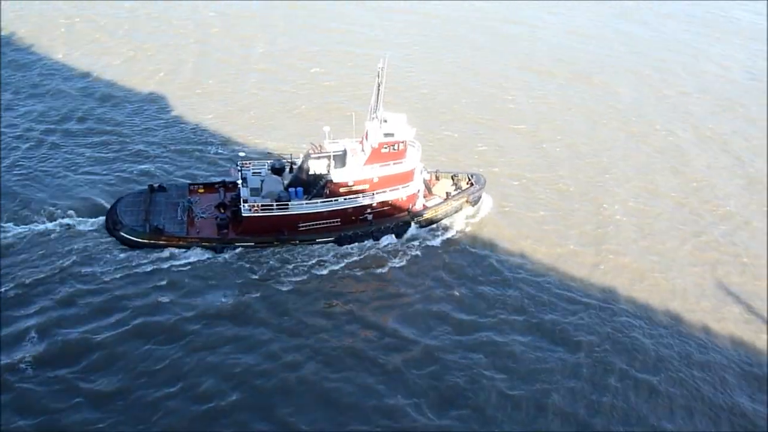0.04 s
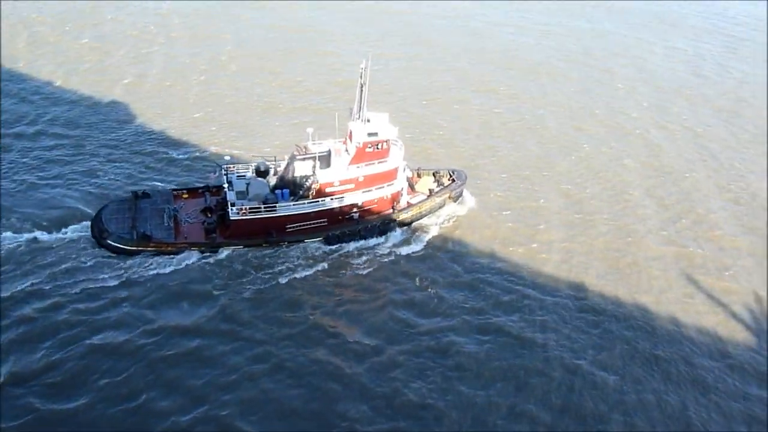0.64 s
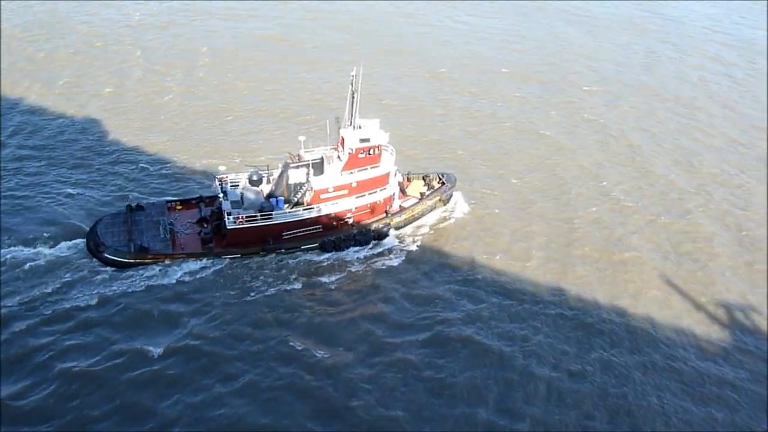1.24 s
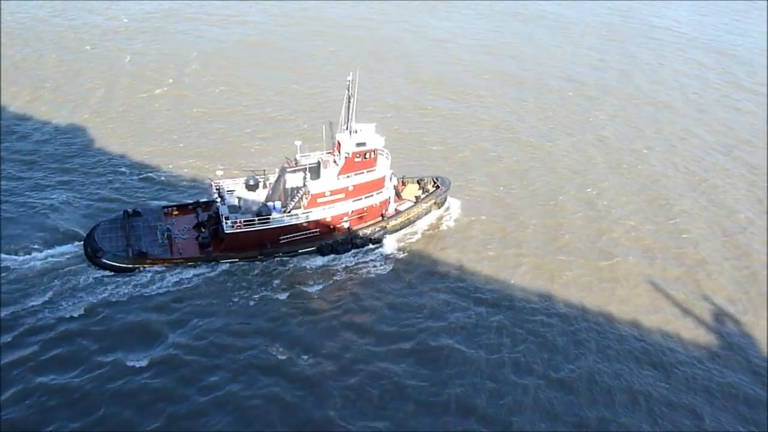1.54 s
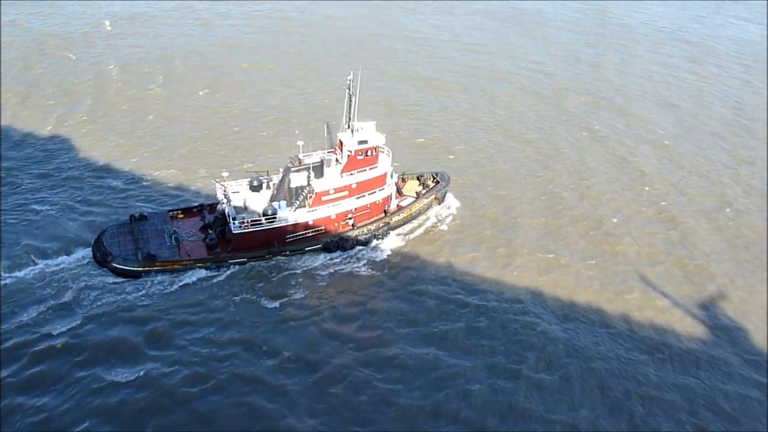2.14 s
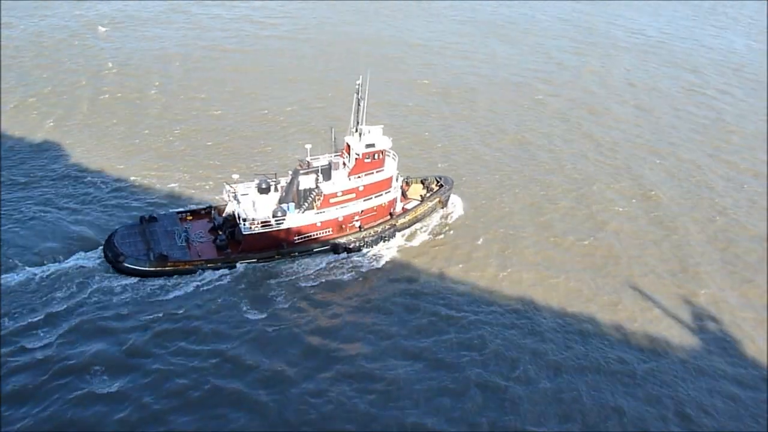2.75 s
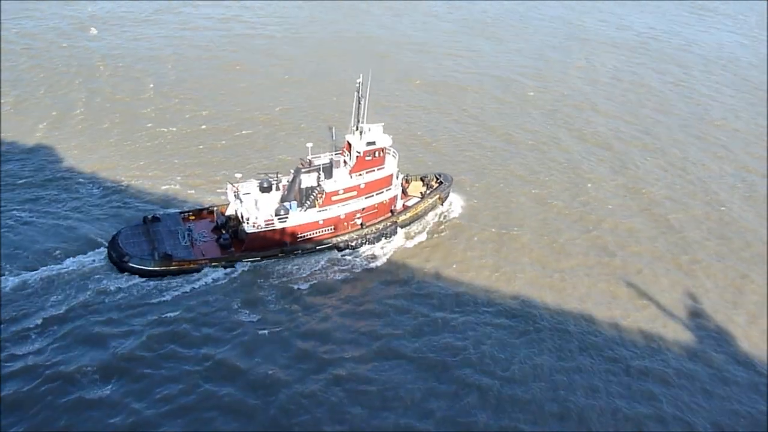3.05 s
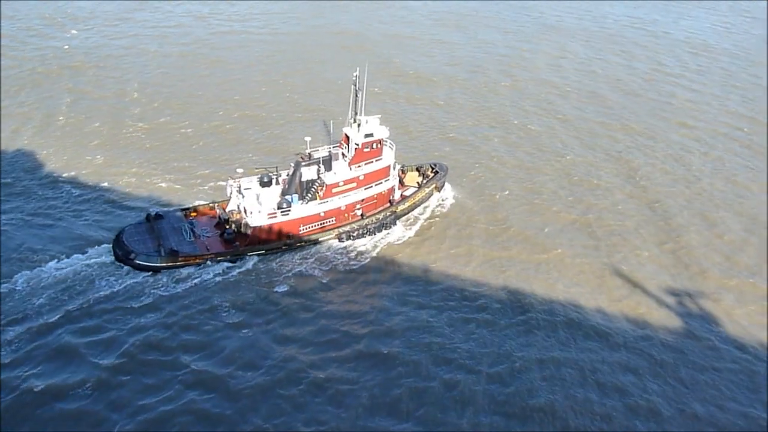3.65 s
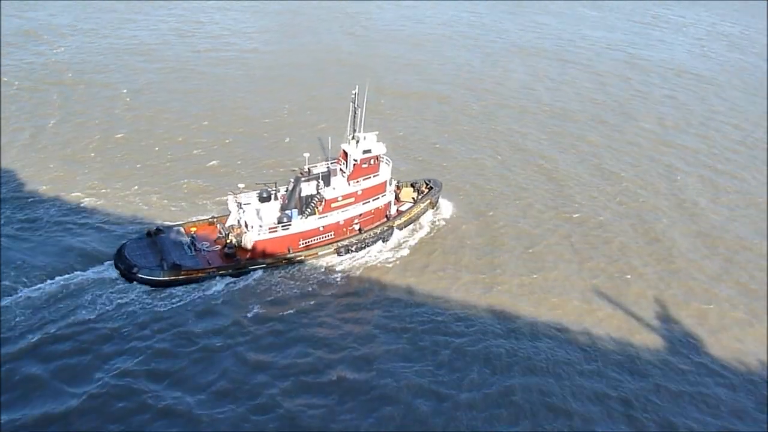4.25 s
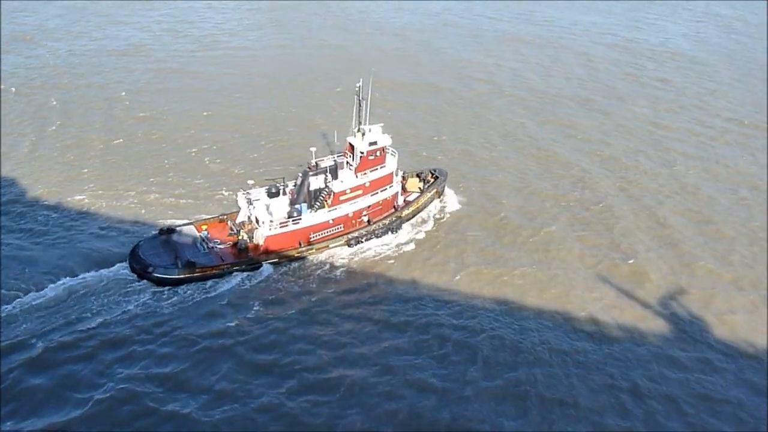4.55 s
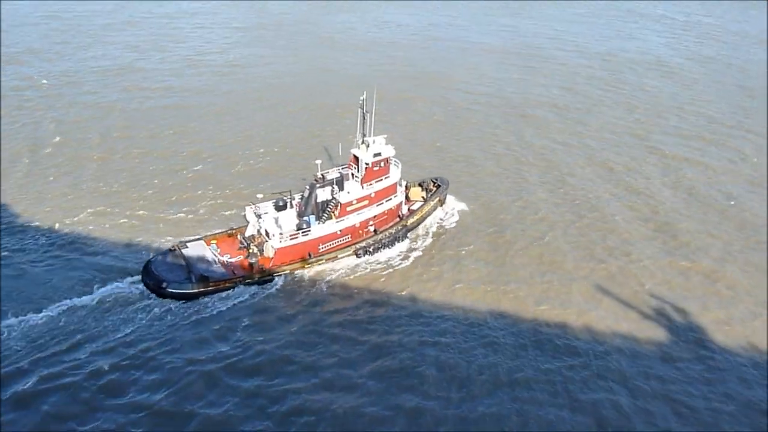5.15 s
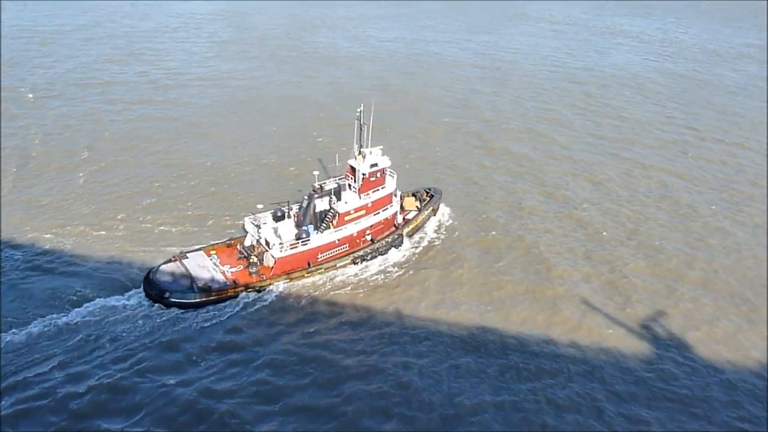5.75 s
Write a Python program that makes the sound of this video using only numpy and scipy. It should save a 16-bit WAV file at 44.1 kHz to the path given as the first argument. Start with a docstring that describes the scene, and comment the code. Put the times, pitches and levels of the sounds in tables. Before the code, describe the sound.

A ship's deep, brassy air horn sounds two long blasts, echoing across a harbour over a faint tugboat hum and washing water.

```python
"""Ship's air horn over a harbour

A deep air horn sounds two long blasts, heard from high on deck; the first is already under way.
Its diaphragm lets out one sharp puff a cycle; moving air makes the upper partials swell and fade,
and the quays echo. The air valve hisses before the horn speaks. Between the blasts a tug's diesel
hums and whines below, over the wash of the water and a light wind."""
import sys
import numpy as np
from scipy import signal
from scipy.fft import rfft, irfft, next_fast_len
from scipy.io import wavfile

SR = 44100
rng = np.random.default_rng(int(sys.argv[2]) if len(sys.argv) > 2 else 0)


def dump_mix(stems):
    """Bounce the given channels to the path in sys.argv[1] as a 16-bit WAV at rate SR."""
    frames = np.atleast_2d(stems).T  # one column per channel
    limited = np.clip(frames, -1, 1)  # hard clip at full scale
    pcm = np.round(limited * 32767).astype(np.int16)
    wavfile.write(sys.argv[1], SR, pcm)


N = 259749

# the blasts: start_s, valve_shut_s, treble_fall_db_per_s, ring_fall_db_per_s, air_off_s
BLASTS = [(-0.4015, 1.684, 562, 118, 1.68), (2.9704, 5.688, 22, 177, 5.76)]
# borders of the horn's bass, middle, treble, rasp and sizzle: edge_hz
REGISTER_EDGES = [140, 600, 1450, 3000, 6000, 14000]
# level ride of the horn's treble, one curve a blast: time_s, level_db
TREBLE_RIDE = [
    [(0.02, -34), (0.028, -28), (0.17, -32.5), (0.24, -40), (0.386, -37), (0.432, -42), (0.538, -38.5),
     (0.622, -26), (0.768, -34.5), (0.85, -42.5), (1.214, -37), (1.26, -42.5), (1.416, -37), (1.522, -38),
     (1.582, -26), (1.67, -28)],
    [(3.15, -35), (3.2, -38.5), (3.44, -27.5), (3.53, -34), (3.71, -25), (3.81, -34), (3.99, -30),
     (4.31, -43.5), (4.37, -35), (4.58, -44), (4.73, -36.5), (5.3, -37.5), (5.4, -32.5), (5.62, -48),
     (5.68, -40)],
]
# how alike left and right are in the echoes and the water: frequency_hz, correlation
STEREO_LIKENESS = [(30, .6), (100, .95), (250, .995), (500, .97), (1000, .85), (2500, .5), (6000, .15)]

HORN_HZ = 92.71
ATTACK_S, SETTLE_S = 0.073, 0.09  # the horn speaks, then settles
DROP_S, RING_S = 0.037, 0.23  # it drops as the valve shuts, then its low partials ring on


def air_horn():
    """The horn's direct sound: blasts of diaphragm puffs, each register riding its own level curve."""
    # level rides, one curve a blast: time_s, level_db
    bass = [
        [(0.02, -19.5), (0.386, -17.5), (0.622, -18.5), (0.69, -20.5), (1.512, -17.5), (1.67, -21)],
        [(3.05, -19), (3.17, -21.5), (3.24, -20.5), (3.75, -21.5), (3.9, -18.5), (4.38, -21), (4.78, -21.5),
         (4.9, -18.5), (5.68, -20)],
    ]
    middle = [
        [(0.02, -28), (0.038, -26), (0.208, -33.5), (0.386, -28.5), (0.456, -31), (0.714, -30), (0.764, -32.5),
         (0.87, -28.5), (1.02, -31), (1.67, -25)],
        [(3.15, -28.5), (3.16, -29.5), (3.52, -22.5), (3.96, -29.5), (4.73, -29), (4.95, -35.5), (5.15, -29.5),
         (5.31, -34.5), (5.57, -33), (5.68, -36.5)],
    ]
    rasp = [
        [(0.02, -44), (0.44, -51), (0.72, -43), (0.86, -48), (1.21, -46.5), (1.28, -52), (1.42, -45),
         (1.49, -46.5), (1.56, -40), (1.6, -43.5), (1.67, -35.5)],
        [(3.06, -41.5), (3.27, -41.5), (3.41, -49.0), (3.51, -37.0), (3.65, -39.5), (3.69, -35.5),
         (3.79, -48.5), (4.0, -42), (4.14, -45), (4.28, -47.5), (4.53, -46.5), (4.63, -50), (5.23, -44.0),
         (5.3, -49.5), (5.47, -45), (5.61, -51), (5.67, -45)],
    ]
    sizzle = [
        [(0.02, -50.5), (0.06, -37.5), (0.13, -48.5), (0.16, -44), (0.2, -53.5), (0.79, -52.5), (1.28, -58.5),
         (1.42, -53), (1.49, -65), (1.6, -45), (1.67, -48.5)],
        [(3.06, -52.5), (3.13, -48.0), (3.2, -58), (3.3, -46.5), (3.41, -53.0), (3.48, -46.5), (3.65, -52.0),
         (3.69, -45), (3.79, -53.0), (4.0, -50), (4.32, -59), (4.53, -51.5), (4.56, -58), (5.23, -51.5),
         (5.3, -61), (5.47, -52.5), (5.67, -59.5)],
    ]
    blasts = zip(BLASTS, bass, middle, TREBLE_RIDE, rasp, sizzle)
    return gain_of(0.1) * sum(blast(row, rides) for row, *rides in blasts)


def blast(row, rides, size=2048, flare_hz=380, top_hz=10000, flicker_db=3.4):
    """One pressure pulse for each opening of the diaphragm, coloured by the horn and the air on the way."""
    start, shut, treble_fall, ring_fall, _ = row
    t = np.arange(start, min(shut + RING_S, N / SR), 1 / SR)
    hz = np.fft.rfftfreq(size, 1 / SR)
    cycles = np.cumsum(horn_pitch(t, start, shut)) / SR
    pulse_s = np.interp(np.arange(cycles[-1]), cycles, t)
    pulse_s = pulse_s[pulse_s >= 0]
    onsets, lead_in = (pulse_s * SR).astype(int), size // 8
    left, right = turbulence(pulse_s, hz)
    db = horn_colour(hz) + swells(pulse_s, hz)
    db = ride_registers(db, (left + right) / 2, pulse_s, hz, rides, size)
    db += horn_envelope(pulse_s, hz, start, shut, treble_fall, ring_fall)
    # the very top flickers as a whole
    db += flicker_db * np.outer(drift(rate_hz=50)[onsets], np.minimum(hz / top_hz, 1) ** 2)
    delay_samples = pulse_s * SR - onsets + lead_in
    spectra = minimum_phase(db) * np.exp(-2j * np.pi * hz / SR * delay_samples[:, None])
    # long waves linger in the flare, so each crack is followed by a slower swing
    spectra *= np.exp(1j * (np.pi / 2 - 2 * np.arctan(hz / flare_hz)))
    pulses = irfft(np.array([left, right]) * spectra, size)
    train = np.zeros((2, N + 2 * size))
    for k, onset in enumerate(onsets):
        train[:, onset:onset + size] += pulses[:, k]
    return train[:, lead_in:lead_in + N]


def horn_pitch(t, start, shut, sharp_hz=4.2, sag_hz=1.6):
    """The first burst of air drives the horn sharp; it settles, then sags as its air is cut."""
    sharp = sharp_hz * np.exp(-(t - start) / SETTLE_S)
    sag = sag_hz * np.clip((t - shut) / DROP_S + 1, 0, 1)
    return HORN_HZ + sharp - sag


def horn_colour(hz):
    """The horn's timbre in dB; its flare radiates almost nothing below the fundamental."""
    # the body of the tone: harmonic_number, relative_db
    partials = [(1, -10.5), (2, -0.6), (3, 4), (4, 1.5), (5, -2), (6, -2.5), (7, -11), (8, -8), (9, -6),
                (10, -7.5), (11, -5.5), (12, -13.5), (13, -11), (14, -12)]
    # its brassy top: frequency_hz, relative_db
    brass = [(1500, -16), (2000, -15.5), (2500, -19), (2950, -25.5), (5000, -36), (7500, -40), (10500, -50),
             (15500, -60.5)]
    body = [(k * HORN_HZ, db) for k, db in partials]
    return spectrum_at([(20, -58.0), (55, -30.0)] + body + list(brass), hz)


def horn_envelope(pulse_s, hz, start, shut, treble_fall, ring_fall):
    """dB of each pulse by frequency: the blast thumps, surges, drops, flutters on and rings out."""
    attack_db, late_db, late_hz = 19.5, 54, 803  # upper partials start lower still, so arrive last
    surge_db, thump_db = 2.5, 4.5
    drop_db, flutter_s, stop_db_per_s = 21, 0.067, 481
    ring_hz, deep_fall_db_per_s = 310, 60  # the fundamental dies slowest
    age = pulse_s[:, None] - start
    since_shut = np.maximum(pulse_s[:, None] - shut, 0)
    deep = 1 / (1 + (hz / REGISTER_EDGES[0]) ** 10)
    low = 1 / (1 + (hz / ring_hz) ** 20)
    high = hz ** 2 / (hz ** 2 + REGISTER_EDGES[2] ** 2)
    late = hz ** 2 / (hz ** 2 + late_hz ** 2)
    attack = -(attack_db + late_db * late) * np.maximum(1 - age / ATTACK_S, 0)
    surge = (surge_db + thump_db * deep) * np.exp(-np.maximum(age - ATTACK_S, 0) / SETTLE_S)
    drop = drop_db * (1 - np.exp(-since_shut / DROP_S)) * (1 - high) + treble_fall * since_shut * high
    stop = stop_db_per_s * np.maximum(since_shut - flutter_s, 0)
    ring = (deep * deep_fall_db_per_s + (1 - deep) * ring_fall) * since_shut
    return attack + surge - (1 - low) * (drop + stop) - low * ring


def ride_registers(db, air_path, pulse_s, hz, rides, size):
    """Pulls each register of each pulse, as heard through the air, towards its level ride."""
    edges = np.array(REGISTER_EDGES)
    above = [hz ** 7 / (hz ** 7 + float(edge) ** 7) for edge in edges[1:-1]]
    crossover = -np.diff([np.ones_like(hz), *above, np.zeros_like(hz)], axis=0)
    target_db = np.transpose([np.interp(pulse_s, *np.transpose(ride)) for ride in rides])
    in_register = (hz[:, None] >= edges[:-1]) & (hz[:, None] < edges[1:])
    for _ in range(5):  # the registers overlap, so it takes several passes
        power = abs(gain_of(db) * air_path) ** 2 @ in_register * 2 * HORN_HZ / SR / size
        db = db + (target_db - 10 * np.log10(power)) @ crossover
    return db


def swells(pulse_s, hz):
    """dB by which moving air briefly focuses or cancels a range of partials."""
    # swells and dips: time_s, half_length_s, centre_hz, glide_octaves_per_s, half_width_octaves, gain_db
    patches = [(0.074, 0.17, 2220, -4.5, 0.3, 7), (0.256, 0.22, 994, 0.5, 0.18, -13),
               (0.257, 0.5, 713, 0.5, 0.086, 11.5), (0.3, 0.59, 385, 0, 0.081, 5.5),
               (0.846, 0.45, 798, 0.3, 0.15, -16), (1.327, 0.075, 453, -2.5, 0.068, -25),
               (1.542, 0.22, 476, -0.5, 0.083, 6), (1.62, 0.09, 1300, 0.5, 0.32, 4.5),
               (1.62, 0.09, 3140, 1, 0.23, -13), (3.097, 0.05, 1290, 2, 0.18, 11),
               (3.21, 0.065, 2330, -1, 0.15, -13), (3.45, 0.054, 2300, 0, 0.24, -4),
               (3.57, 0.26, 636, 0, 0.077, -19), (3.69, 0.097, 2970, -3.5, 0.23, 4.5),
               (4.2, 0.17, 650, -0.1, 0.17, -23.5), (4.393, 0.76, 1090, 0.5, 0.3, 2.5),
               (4.65, 0.41, 528, 0, 0.22, -9.5), (4.898, 0.041, 2260, -1, 0.19, 18),
               (5.095, 0.21, 2000, 0.5, 0.2, 9), (5.185, 0.22, 450, 1, 0.097, 6.5),
               (5.35, 0.33, 763, -1, 0.22, 5), (5.557, 0.05, 634, -1, 0.1, -12)]
    total_db = 0
    for at, length, centre, glide, width, db in patches:
        offset_s = pulse_s[:, None] - at
        octaves = np.log2((hz + 1) / centre) - glide * offset_s
        total_db += db * np.exp(-(offset_s / length) ** 2 - (octaves / width) ** 2)
    return total_db


def turbulence(pulse_s, hz):
    """Left and right paths through moving air: middle partials fade slowly, the highest flicker."""
    # the left side faces the horn: frequency_hz, left_minus_right_db
    lean = [(90, -1.1), (185, -0.8), (280, -0.3), (550, 0.2), (760, 0.6), (1020, 4), (1400, 6),
            (2000, 10.2), (2600, 9.7), (3400, 13), (4400, 14), (8000, 5.8), (15000, 0)]
    # and hears it first: frequency_hz, left_lead_radians
    lead = [(90, 0.17), (185, 0.03), (560, 0), (1020, 0.1), (1400, 0.19), (2000, 0.49), (2600, 1.05),
            (3400, 2.1), (4500, 1.3), (8000, 1.95), (11000, 2.3), (15000, 2.1)]
    fade = 0.71 * np.minimum(hz / 1300, 1) ** 2 * air_paths(pulse_s, hz, spread_ms=2.488, rate_hz=7.7)
    flicker = 0.78 * np.minimum(hz / 6000, 1) * air_paths(pulse_s, hz, spread_ms=1.505, rate_hz=30)
    left = 1 + fade + flicker
    # the right side lies in shadow and hears more scatter
    shadow = gain_of(-spectrum_at(lean, hz)) * np.exp(-1j * spectrum_at(lead, hz))
    scatter = 0.67 * np.minimum(hz / 3000, 1) ** 2 * air_paths(pulse_s, hz, spread_ms=1.83, rate_hz=9.9)
    return left, shadow * (left + scatter)


def air_paths(pulse_s, hz, spread_ms, rate_hz, count=24):
    """Slightly late copies of each pulse that wax and wane as the air moves."""
    lateness = (np.arange(count) + rng.random(count)) / count
    smoothing = np.exp(-(np.fft.rfftfreq(1024, np.mean(np.diff(pulse_s))) / rate_hz) ** 2)
    wander = irfft(rfft(rng.standard_normal((count, 1024))) * smoothing)
    strength = unit_rms(wander[:, :len(pulse_s)].T * (1 - lateness))
    delays = np.exp(-2j * np.pi * np.outer(lateness * spread_ms / 1000, hz))
    return strength @ delays / np.sqrt(count)


def deck_reflections(horn, scatter_hz=600, steadiness=0.8, pivot_db=-34, max_boost_db=3):
    """Close reflections off the deck, which hardly share the treble swells of the direct path."""
    # the deck's short ring: frequency_hz, t60_s, level_db
    deck = [(199, 0.076, -19), (497, 0.052, -15), (1020, 0.08, -6.5), (2200, 0.08, -5), (4000, 0.08, -9),
            (12300, 0.07, -11)]
    highs = signal.sosfiltfilt(signal.butter(2, scatter_hz, "high", fs=SR, output="sos"), horn)
    counter_db = np.minimum(steadiness * (pivot_db - curve(np.concatenate(TREBLE_RIDE))), max_boost_db)
    steadied = horn + highs * (gain_of(counter_db) - 1)
    return shifting_echoes(steadied, deck, delay_s=0.003, count=4)


def quay_echoes(horn):
    """The far quays answer with a long tail, more strongly towards the end."""
    # the harbour's tail: frequency_hz, t60_s, level_db
    harbour = [(90, 2.1, -32), (180, 6.1, -14.5), (274, 1.5, -25), (380, 2, -20.5), (464, 0.67, -23),
               (560, 4.2, -18), (700, 0.76, -15), (1020, 0.36, -13.5), (2500, 0.7, -26), (4500, 0.8, -31),
               (8040, 0.18, -41)]
    # echo send: time_s, gain_db
    send = [(4.4, 1), (5.5, 11)]
    return shifting_echoes(horn * gain_of(curve(send)), harbour, delay_s=0.065, count=2)


def shifting_echoes(x, bands, delay_s, count):
    """Sets of reflections trade places as the air moves, so each partial waxes and wanes on its own."""
    weights = np.array([drift(rate_hz=2.96) for _ in range(count)])
    weights /= np.linalg.norm(weights, axis=0)
    return sum(echoes(x * weight, bands, delay_s) for weight in weights)


def echoes(x, bands, delay_s, size=66000, taps_per_s=3000):
    """Sparse reflections of random sign, each band dying at its own speed."""
    bands = np.array(bands)
    taps = rng.choice([-1., 1.], (2, size)) * (rng.random((2, size)) < taps_per_s / SR)
    hz, t, spectra = signal.stft(taps, SR, nperseg=512)
    alike = spectrum_at(STEREO_LIKENESS, hz)[:, None]
    spectra[1] = alike * spectra[0] + np.sqrt(1 - alike ** 2) * spectra[1]
    t60_s = spectrum_at(bands[:, [0, 1]], hz)[:, None]
    level_db = spectrum_at(bands[:, [0, 2]], hz)[:, None]
    decay = gain_of(-60 * t / t60_s)
    decay *= gain_of(level_db) / np.sqrt(np.mean(decay ** 2, 1, keepdims=True))
    tail = signal.istft(spectra * decay, SR, nperseg=512)[1] / np.linalg.norm(taps[0])
    delayed_tail = np.pad(tail, ((0, 0), (round(delay_s * SR), 0)))
    return signal.fftconvolve(x, delayed_tail, axes=1)[:, :N]


def air_valve(start, air_off, lead_s=0.105, rush_rise_s=0.03, rush_fade_s=0.25, hiss_fade_s=0.0048):
    """Compressed air rushes and squeals before the horn speaks, then hisses until it runs out."""
    # colours of the opening rush and the steady hiss: frequency_hz, density_db
    rush_colour = [(290, -36), (500, -13), (684, -3), (871, -14), (1020, -12), (1130, -25), (1390, -8),
                   (1770, -14), (2230, -17), (2920, -19), (3320, -26.5), (4870, -24.5), (9510, -38),
                   (14000, -47), (15000, -70)]
    hiss_colour = [(290, -50), (600, -14), (1000, -11), (2200, -8.5), (3400, -14.5), (5000, -16.5),
                   (9500, -27), (15000, -39)]
    likeness = [(500, 0.89), (2000, 0.24), (6000, 0.14)]  # frequency_hz, correlation
    t = np.arange(N) / SR
    age = t - start + lead_s
    burst = np.clip(age / rush_rise_s, 0, 1) * np.exp(-np.maximum(t - start, 0) / rush_fade_s)
    rush = noise(rush_colour, likeness) * gain_of(-37.5) * burst
    flow = np.clip((t - start) / ATTACK_S, 0, 1) * np.exp(-np.maximum(t - air_off, 0) / hiss_fade_s)
    hiss = noise(hiss_colour, likeness) * gain_of(-42) * flow
    # the squeal is a falling note with its octave
    squeal_age = np.clip(age, 0, lead_s)
    squeal_hz = 728 - 390 * squeal_age
    squeal = tone(squeal_hz, db=-42, waver_hz=22, flutter_db=2.5)
    squeal += tone(2 * squeal_hz, db=-46, waver_hz=44, flutter_db=2.5)
    squeal *= np.sin(np.pi * squeal_age / lead_s)
    pan_left = gain_of([[2.4], [-2.8]])
    return (rush + hiss + squeal) * pan_left


def tug(firing_hz=121.9):
    """The diesel's firing hum, with a thin machinery whine that comes and goes and fainter whistles."""
    # the hum: time_s, level_db
    hum_ride = [(0, -49), (1.8, -46), (2.2, -47), (2.6, -45), (2.9, -37), (3.2, -49), (5.89, -47)]
    # the whine: time_s, pitch_hz, level_db
    whine_path = [(1.6, 989, -67), (1.8, 980, -61), (1.84, 1015, -62), (1.885, 990, -41.5),
                  (1.93, 1004, -59.5), (2.17, 1028, -54), (2.27, 1006, -45), (2.44, 1007, -40),
                  (2.546, 1010, -51), (2.626, 1004, -40), (2.76, 996, -49), (2.824, 1000, -41),
                  (2.88, 1006, -52), (2.96, 1000, -39), (3.2, 1000, -70)]
    # the whistles: start_s, end_s, pitch_hz, glide_hz, level_db
    whistles = [(1.76, 2.2, 2240, -11, -69), (1.918, 2.15, 509, -25, -44.5), (2.13, 2.25, 1540, -15, -60),
                (2.19, 2.68, 2235, -220, -57.5), (2.03, 2.6, 1260, 14, -56), (2.3, 2.5, 1080, -280, -50)]
    hum = tone(firing_hz, curve(hum_ride), waver_hz=2.34, flutter_db=-3.0)
    whine = tone(curve(whine_path), curve(whine_path, column=2), waver_hz=3, flutter_db=0.5)
    return hum + whine + sum(whistle(*row) for row in whistles)


def whistle(start, end, hz, glide_hz, db):
    """A thin machinery whistle that swells, then bends as it fades."""
    progress = np.clip((np.arange(N) / SR - start) / (end - start), 0, 1)
    swell = np.sin(np.pi * progress ** 1.55)
    return swell * tone(hz + glide_hz * progress ** 3.6, db, waver_hz=3.0, flutter_db=1.5)


def water_wash():
    """A dark bed of water and distant machinery."""
    # its colour: frequency_hz, density_db
    colour = [(25, -22), (60, -6.5), (105, -4.5), (150, -7), (250, -8), (400, -8.5), (490, -10), (570, -14),
              (800, -15.5), (1100, -19.5), (1500, -27.5), (2500, -29), (4000, -36.5), (8000, -48.5),
              (15000, -57)]
    # its level ride: time_s, level_db
    ride = [(0, -39.5), (1.8, -44), (2.05, -44), (2.3, -43), (2.8, -40), (3.1, -44), (5.89, -41.5)]
    return noise(colour, STEREO_LIKENESS) * gain_of(curve(ride) + 0.17 * drift(rate_hz=4.8))


def wind(breeze_db=-53, buffet_db=2.6):
    """A light breeze on the microphone, with gusts that swell and pass."""
    # the rumble's colour: frequency_hz, density_db
    colour = [(20, -23), (50, -21), (110, -17), (200, -20), (400, -23), (1000, -74), (4000, -101)]
    # the gusts: time_s, half_length_s, level_db
    gusts = [(3.648, 1, -50.5), (4.266, 0.19, -41)]
    t = np.arange(N) / SR
    gusting = sum(gain_of(db) * np.exp(-((t - at) / width) ** 2) for at, width, db in gusts)
    rumble = noise(colour, likeness=[(30, 0.46), (120, 0.067)])
    return rumble * (gain_of(breeze_db) + gusting) * gain_of(buffet_db * drift(rate_hz=28))


def tone(hz, db, waver_hz, flutter_db):
    """A sine that wavers in pitch and level."""
    cycles = np.cumsum(hz + waver_hz * drift(rate_hz=28.4)) / SR
    return np.sqrt(2) * gain_of(db + flutter_db * drift(rate_hz=13)) * np.sin(2 * np.pi * cycles)


def noise(colour, likeness):
    """Two partly alike channels of coloured noise, rms 1."""
    size = next_fast_len(N, True)
    hz = np.fft.rfftfreq(size, 1 / SR)
    left, unrelated = rfft(rng.standard_normal((2, size)))
    alike = np.clip(spectrum_at(likeness, hz), -1, 1)
    right = alike * left + np.sqrt(1 - alike ** 2) * unrelated
    return unit_rms(irfft(np.array([left, right]) * gain_of(spectrum_at(colour, hz)), size)[:, :N])


def drift(rate_hz):
    """A smooth random wander, rms 1."""
    size = next_fast_len(N, True)
    smoothing = np.exp(-(np.fft.rfftfreq(size, 1 / SR) / rate_hz) ** 2)
    return unit_rms(irfft(rfft(rng.standard_normal(size)) * smoothing, size)[:N])


def minimum_phase(db):
    """Spectra of pulses that start sharply and then ring, from their levels."""
    nepers = np.maximum(db, -130) * np.log(10) / 20
    mirrored = np.concatenate([nepers, nepers[:, -2:0:-1]], 1)
    return np.exp(np.conj(signal.hilbert(mirrored, axis=1))[:, :db.shape[1]])


def spectrum_at(points, hz):
    """Frequency points joined by lines on a log axis."""
    point_hz, value = np.transpose(points)
    return np.interp(np.log(hz + 1), np.log(point_hz + 1), value)


def curve(rows, column=1):
    """One column of a time table at every sample."""
    rows = np.asarray(rows)
    return np.interp(np.arange(N) / SR, rows[:, 0], rows[:, column])


def gain_of(db):
    """Decibels to a factor."""
    return 10 ** (np.asarray(db) / 20)


def unit_rms(x):
    """Scaled to rms 1."""
    return x / np.sqrt(np.mean(x ** 2) + 1e-20)


def scene():
    """The horn with its reflections and valve air, over water, tug and wind."""
    horn = air_horn()
    reflections = deck_reflections(horn) + quay_echoes(horn)
    air = sum(air_valve(start, air_off) for start, *_, air_off in BLASTS)
    return horn + reflections + air + water_wash() + tug() + wind()


def record(dry):
    """A steep low-pass trims the very top."""
    cutoff_hz = 15780
    low_pass = signal.firwin(511, cutoff_hz, window=("kaiser", 9), fs=SR)
    return signal.oaconvolve(dry, low_pass[None], "same")


dry = scene()
out = record(dry)
dump_mix(out)
```